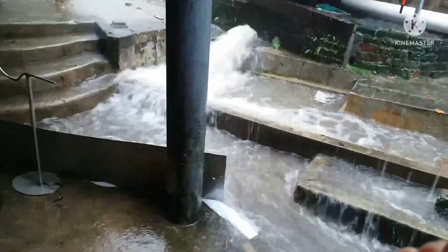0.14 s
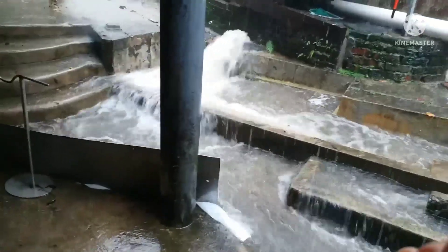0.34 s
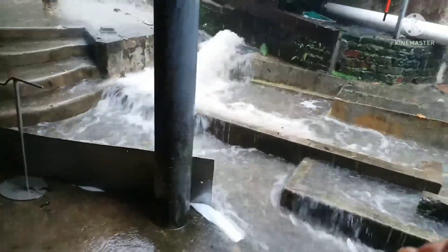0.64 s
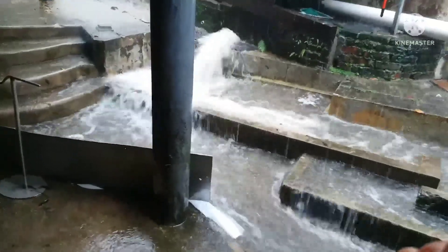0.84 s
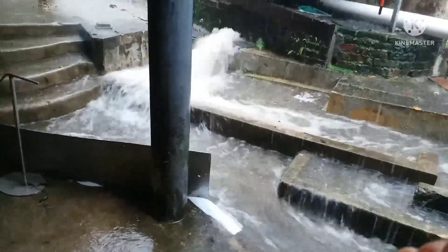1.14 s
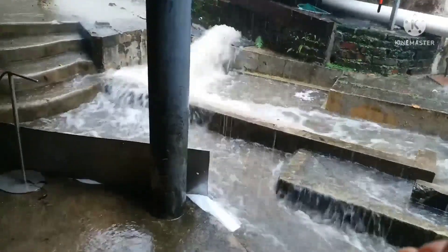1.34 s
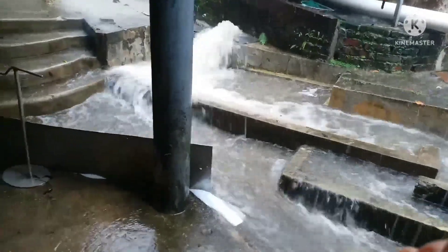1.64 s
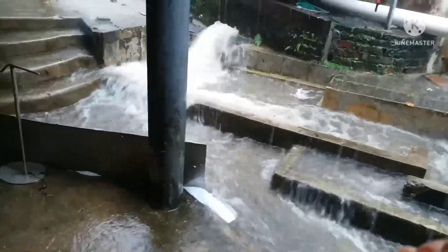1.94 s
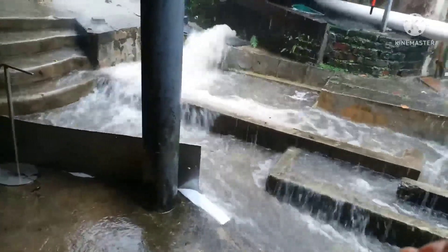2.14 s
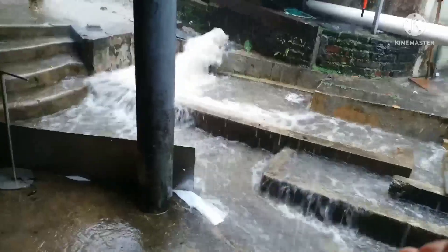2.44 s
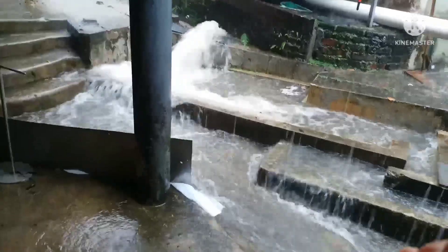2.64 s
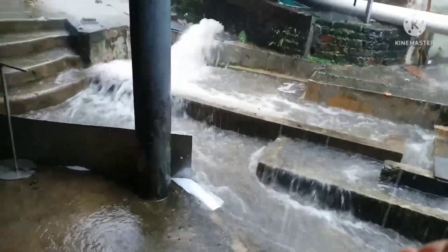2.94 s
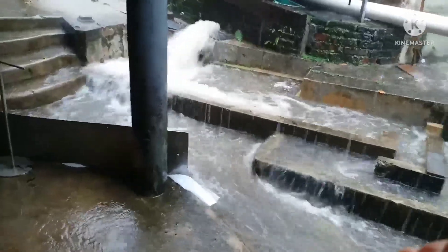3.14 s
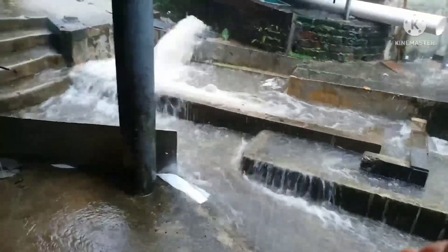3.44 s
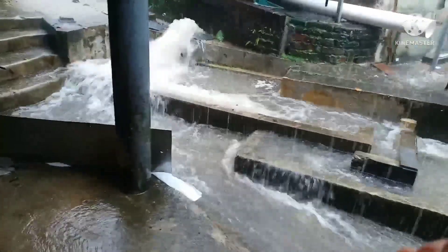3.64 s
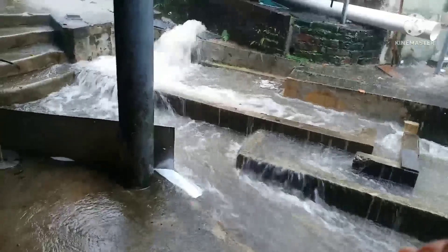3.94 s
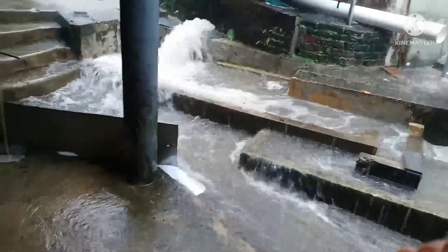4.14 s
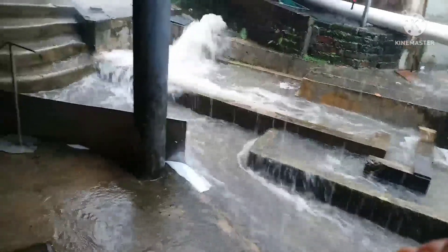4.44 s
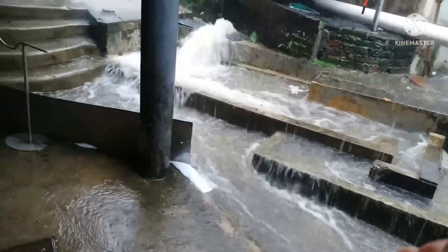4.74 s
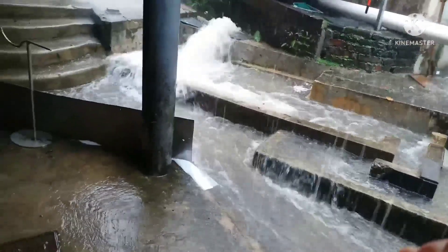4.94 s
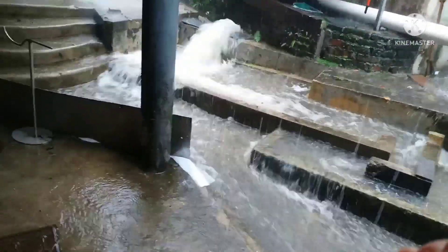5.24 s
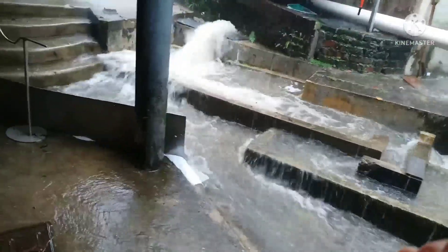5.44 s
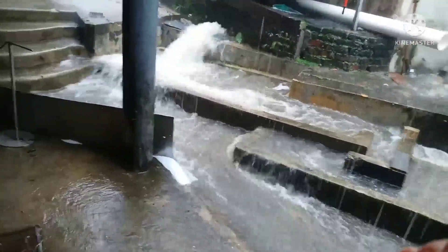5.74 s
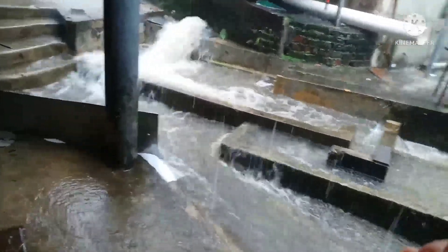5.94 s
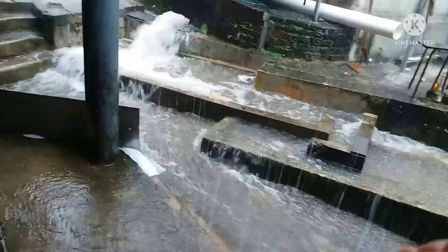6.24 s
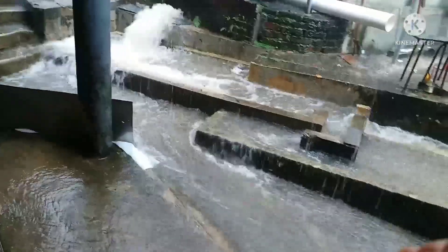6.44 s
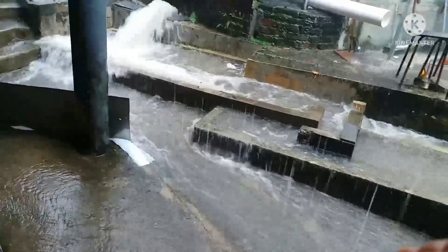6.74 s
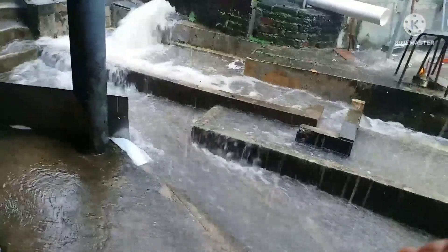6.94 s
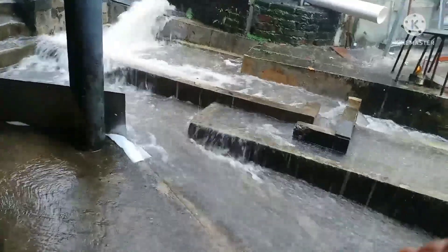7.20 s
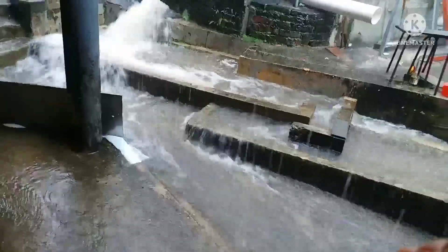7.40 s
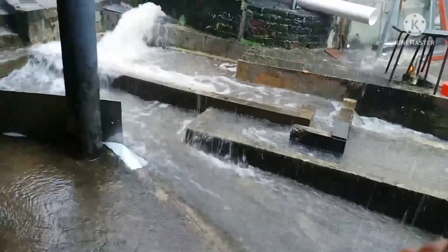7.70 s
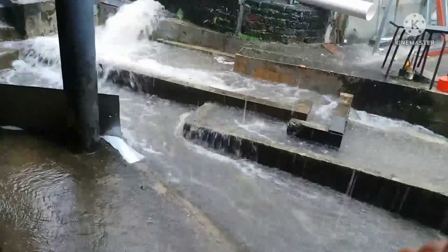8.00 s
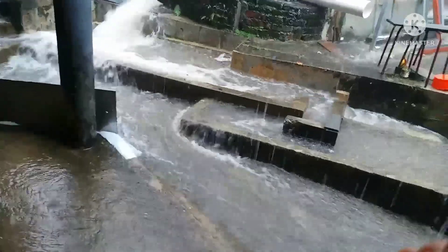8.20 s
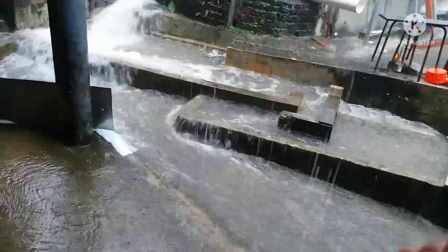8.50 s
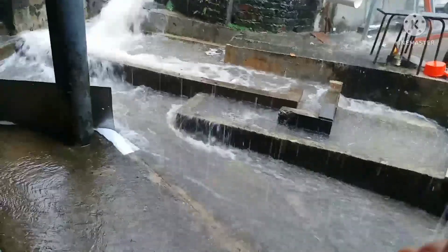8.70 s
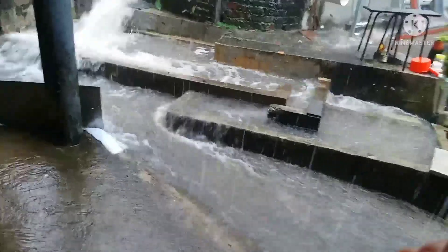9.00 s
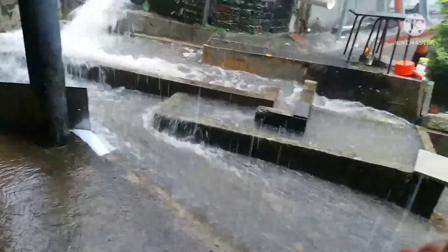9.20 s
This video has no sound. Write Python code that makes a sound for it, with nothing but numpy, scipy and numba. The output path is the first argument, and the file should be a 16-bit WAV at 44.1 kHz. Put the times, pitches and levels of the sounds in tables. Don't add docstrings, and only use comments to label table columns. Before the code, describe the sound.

A powerful flood pours down concrete steps a few metres from a porch in heavy rain, continuous and loud from the first instant to the end at about 9.4 s. The body is a dense, slightly boomy low roar with bubbling gurgle in the middle, topped by fizzing spray and fine rain crackle that flutters in quick small slaps. It starts strong, eases just after 1 s, lifts slightly around 2 s, dips near 3 s, then grows to its fullest around 5.5 s. It ebbs until 7.4 s and rises again toward 8.6 s. Close drops from the roof edge tick irregularly throughout, bright and very short; a hard one snaps at 2.2 s and a dull thump lands at 3.8 s. Wide handheld phone stereo, softened at the very top.

```python
import sys
import numpy as np
from scipy import signal
from scipy.fft import rfft, irfft, next_fast_len
from scipy.io import wavfile
from scipy.ndimage import uniform_filter1d
from numba import njit

SR = 44100
rng = np.random.default_rng(int(sys.argv[2]) if len(sys.argv) > 2 else 0)


def linear_from_db(decibels):
    return 10 ** (np.asarray(decibels, float) / 20)


def log_audio(samples):
    frames = np.atleast_2d(samples).T
    limited = np.clip(frames, -1, 1)
    pcm = np.round(limited * 32767).astype(np.int16)
    wavfile.write(sys.argv[1], SR, pcm)


N = 412776
FFT = next_fast_len(N)
HZ = np.arange(FFT // 2 + 1) * SR / FFT + 1e-3
PORT_GAP_S = 0.0005

# (low edge [Hz], high edge [Hz], grains [1/s], grain length [cycles], size scatter [dB],
#  grain share [0-1], slaps [1/s], slap depth [dB], trim [dB])
ROAR = (59.4, 452, 1500, 6., 2.35, .3, 5.6, 0.41, 0.1)
SPRAY = (1400, 5700, 15000, 3.6, 2.8, 0.43, 20, 0.59, 0.09)
MIST = (10100, 20000, 14000, 1.5, 3.1, 0.46, 24, 0.75, 0.1)


def water(layer, gain, surge):
    # (frequency [Hz], level [dB per Hz])
    colour = [(18, -63), (30, -37), (87, -19), (154, -4.5), (185, -2.5), (296, -4), (905, -4), (1140, -6),
              (2770, -7.5), (4540, -8.5), (6700, -13), (8040, -9.5), (9390, -18.5), (11600, -20),
              (15000, -26)]
    biggest = 4.6
    rightward = 0.617
    shade_db = 2.5
    lo_hz, hi_hz, rate, cycles, scatter_db, share, slap_rate, slap_db, trim_db = layer

    when, octave, side, chance = rng.random((int(rate * N / SR), 4)).T
    hz = np.minimum(0.611 * lo_hz * (2.51 * hi_hz / lo_hz) ** octave, 0.4 * SR)
    side = 2 * side ** rightward - 1
    pan_db = -shade_db * (side - side.mean()) * hz / (hz + 2000)
    start, shade = at_ports(when * N / SR, side, pan_db)
    size = hz * linear_from_db(scatter_db * np.minimum(-np.log(1 - chance), biggest))
    grains = rfft(ring(start, hz, cycles, 0.16, size * shade), FFT)

    inside = (HZ > lo_hz) & (HZ < hi_hz)
    grains *= np.sqrt(FFT / np.mean(np.abs(grains[:, inside]) ** 2))
    mix = np.sqrt(share) * grains + np.sqrt(1 - share) * hush()
    below = 1 if layer is ROAR else 1 / (1 + (lo_hz / HZ) ** 4)
    above = 1 if layer is MIST else 1 / (1 + (HZ / hi_hz) ** 4)
    sound = irfft(mix * np.sqrt(below * above) * on_hz(colour), FFT)[:, :N]
    return sound * gain * linear_from_db(trim_db + slap_db * walk(slap_rate) + surge)


@njit
def ring(start, hz, cycles, glide, size):
    out = np.zeros((2, N))
    for c in range(2):
        for k in range(len(hz)):
            w = 2 * np.pi * hz[k] / SR
            p = np.exp(1j * w - 6.9 * hz[k] / (SR * cycles))
            steps = int(cycles * SR / hz[k])
            bend = np.exp(1j * w * glide / steps)
            first = int(start[c, k]) + 1
            z = size[c, k] * p ** (first - start[c, k])
            for i in range(max(first, 0), min(first + steps, N)):
                out[c, i] += z.imag
                z *= p
                p *= bend
    return out


def swing(follow):
    # (time [s], level [dB])
    swell = [(0, -21.5), (.45, -22), (.7, -24), (1.3, -24.5), (1.9, -23), (2.25, -23), (2.8, -25.2),
             (3.25, -25.5), (3.75, -23.4), (4.3, -23), (5.35, -21), (5.75, -21), (6.35, -22.5),
             (6.75, -23.5), (7.4, -24.5), (7.85, -22.5), (8.6, -21.7), (9.36, -22.5)]
    s, db = np.transpose(swell)
    return linear_from_db(follow * np.interp(np.arange(N) / SR, s, db - db.mean()))


def walk(rate):
    k = int(SR / rate)
    held = np.repeat(rng.standard_normal(N // k + 1), k)
    held = uniform_filter1d(uniform_filter1d(held, k), k)[:N]
    quick = held - uniform_filter1d(held, size=SR // 8)
    return quick / quick.std()


def spatter(fall):
    lift, fade_s = 0.3, 0.014
    s, db, hz = fall[:3]
    kick = np.zeros(N)
    kick[(s * SR).astype(int)] = lift * linear_from_db(db) * (hz > SPRAY[0])
    return 1 + signal.lfilter([1], [1, -np.exp(-1 / (fade_s * SR))], kick)


def drops(fall):
    s, db, hz, db_left_right = fall
    contact_s = 0.00021
    cycles = 0.85 + hz * contact_s
    width = 1.3 * cycles
    start, shade = at_ports(s, -db_left_right / 90, db_left_right)
    size = shade * linear_from_db(db - 0.7 - np.abs(db_left_right) / 2)
    at = start.astype(int)[..., None] + np.arange(-200, 200)
    turns = (at - start[..., None]) * hz[:, None] / SR
    swell_fade = np.exp(-(2 * turns / width[:, None]) ** 2)
    plink = size[..., None] * np.sin(2 * np.pi * turns) * swell_fade
    out = np.zeros((2, N))
    for port in range(2):
        np.add.at(out[port], at[port], plink[port])
    return out


def falling():
    # (time [s], peak level [dB], pitch [Hz], left minus right [dB])
    heavy = [(0.2323, -9, 4720, -5), (0.3137, -10, 8680, -4), (0.3416, -6, 8290, -10),
             (0.4627, -4.5, 3840, -4), (0.5224, -10, 3780, -6), (0.9127, -8, 4930, -6),
             (1.5213, -9, 3610, -4), (2.2089, -2, 3150, -5), (2.223, -11, 2900, -4), (2.2547, -9, 5190, -4),
             (2.3121, -9, 4900, -9), (2.5845, -8, 5200, -7), (2.5856, -11, 3800, -5),
             (3.8086, -6.5, 1250, 1), (3.8108, -12, 800, 1), (3.8729, -10, 3470, -8),
             (5.0241, -10, 5290, -10), (5.3388, -10, 4950, -1), (5.3805, -9, 7620, -7),
             (5.4507, -9, 3600, -7), (5.6949, -10, 8250, -8), (5.9101, -10, 4810, -3),
             (6.3429, -6, 5000, -6), (6.5926, -9, 4650, -10), (6.7619, -10, 3760, -5),
             (7.2231, -9, 5150, -4), (7.5063, -9, 4960, -2), (8.1223, -10, 4720, -8),
             (8.4235, -6, 3860, -9), (8.6031, -9, 7790, -6)]
    drops_per_s, light_db, scatter_db = 5.2, -12.5, 1.5
    pitches_hz, shares, detune = np.array([3500, 5000, 8000]), [0.15, 0.2, 0.65], 0.05
    pan_db, pan_scatter_db = -4.5, 4.5

    count = int(drops_per_s * N / SR)
    when, kind = rng.random((count, 2)).T
    loud, off_pitch, side = rng.standard_normal((count, 3)).T
    hz = pitches_hz[np.searchsorted(np.cumsum(shares), kind * sum(shares))]
    light = [0.02 + when * (N / SR - 0.04),
             light_db + scatter_db * loud,
             hz * (1 + detune * off_pitch),
             pan_db + pan_scatter_db * side]
    return np.hstack([np.transpose(heavy), light])


def hush():
    unlike_bass = 0.028
    alike = (1 - unlike_bass) * np.sinc(2 * HZ * PORT_GAP_S)
    mid, side = rfft(rng.standard_normal((2, FFT)))
    mid = mid * np.sqrt((1 + alike) / 2)
    side = side * np.sqrt((1 - alike) / 2)
    return mid + np.array([[1], [-1]]) * side


def at_ports(s, side, db_left_right):
    both = np.array([[0.5], [-0.5]])
    return (s + both * side * PORT_GAP_S) * SR, linear_from_db(both * db_left_right)


def on_hz(table):
    hz, db = np.transpose(table)
    return linear_from_db(np.interp(np.log(HZ), np.log(hz), db))


def scene():
    gurgle_layer = (475, 1396, 3000, 9.1, 2.7, .4, 8, 0.53, 0.1)
    rain_layer = (5630, 10000, 14000, 1.8, 3.4, 0.47, 20, 0.74, 0.1)
    # (roar, gurgle, spray, rain, mist) [dB per dB]
    follows = (.95, 0.97, 0.96, 1.2, 0.87)
    # (frequency [Hz], left minus right [dB])
    left_port = [(100, -1.5), (250, -.5), (1200, -0.6), (3000, -0.5), (6000, -4.5), (8000, 1), (9500, -3),
                 (12000, -0.5)]
    boom_hz, boom_width_hz, boom_db = 192, 30, 2.5
    flood_db = -19.5

    surge = 0.1 * walk(22)
    roar, gurgle, fizz, rain, mist = (swing(follow) for follow in follows)
    flood = water(ROAR, roar, 0) + water(gurgle_layer, gurgle, 0.15 * surge)
    spray = water(SPRAY, fizz, surge)
    spray += water(rain_layer, rain, 0.98 * surge)
    spray += water(MIST, mist, 0.3 * surge)
    fall = falling()
    tilt = np.sqrt(on_hz(left_port))
    boom = linear_from_db(boom_db / (1 + (2 * (HZ - boom_hz) / boom_width_hz) ** 2))
    heard = rfft(flood + spray * spatter(fall), FFT) * boom * np.array([tilt, 1 / tilt])
    flood = irfft(heard, FFT)[:, :N]
    return flood * linear_from_db(flood_db) / np.sqrt(np.mean(flood ** 2)) + drops(fall)


def roll_off(x):
    return signal.sosfilt(signal.butter(12, 16500, fs=SR, output="sos"), x)


def record(dry):
    edge_hz, top_hz, edge_db = 15170, 15560, -6
    top = np.where(HZ < edge_hz, 1, linear_from_db(edge_db)) * (HZ < top_hz)
    mix = irfft(rfft(dry, FFT) * top, FFT)[:, :N]
    return roll_off(mix)


dry = scene()
out = record(dry)
log_audio(out)
```